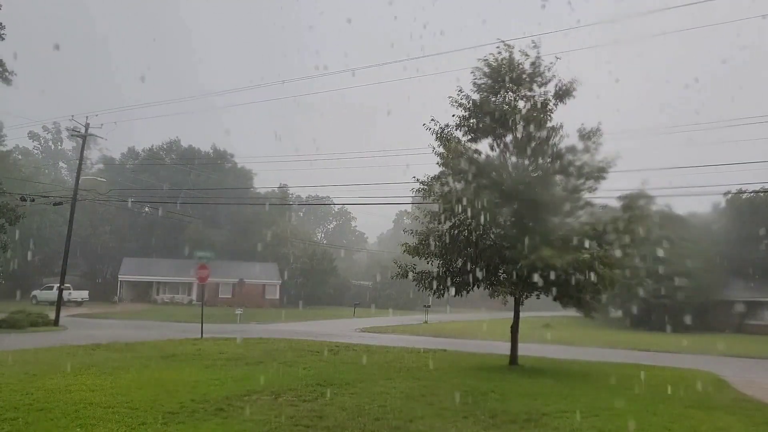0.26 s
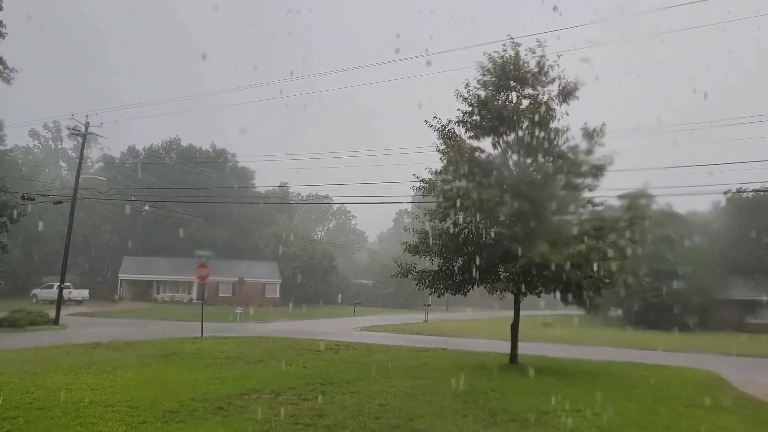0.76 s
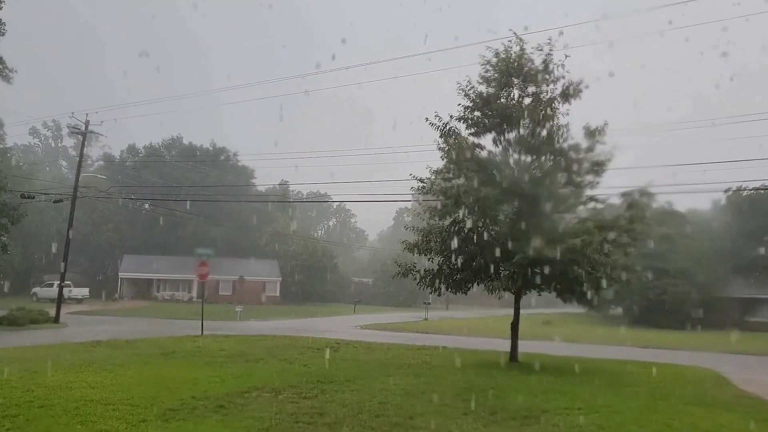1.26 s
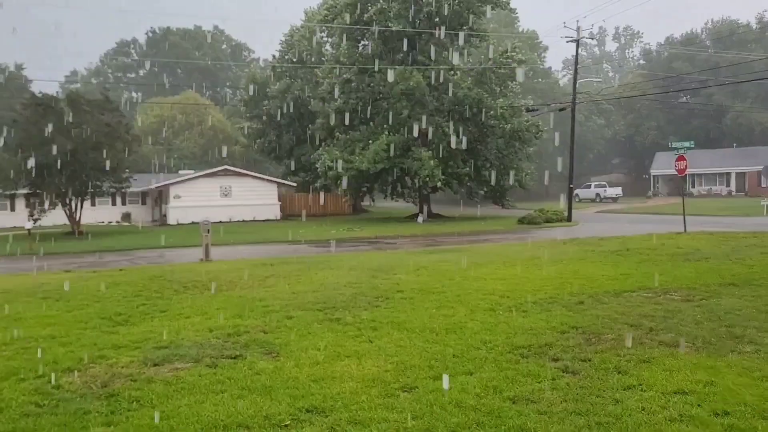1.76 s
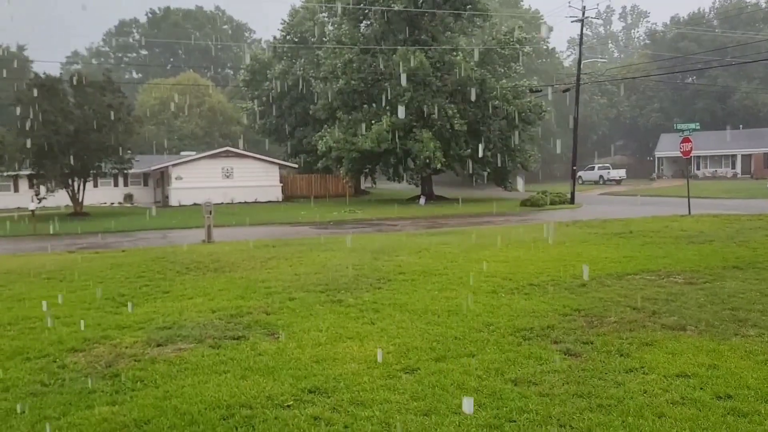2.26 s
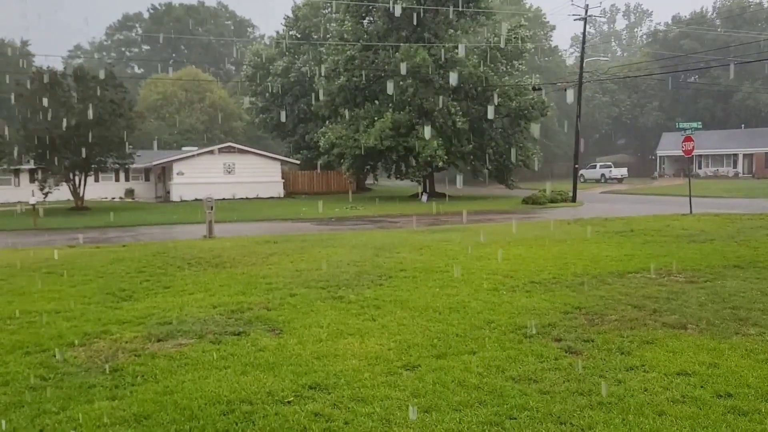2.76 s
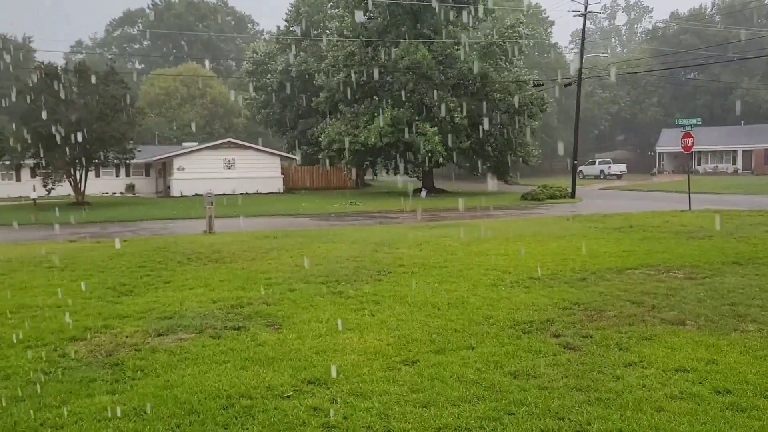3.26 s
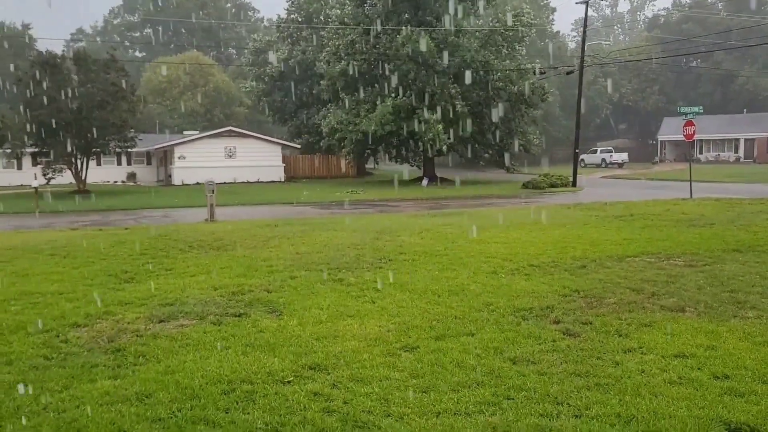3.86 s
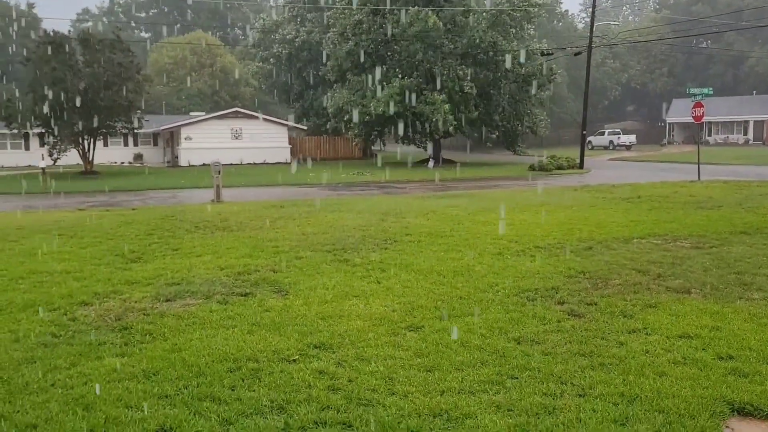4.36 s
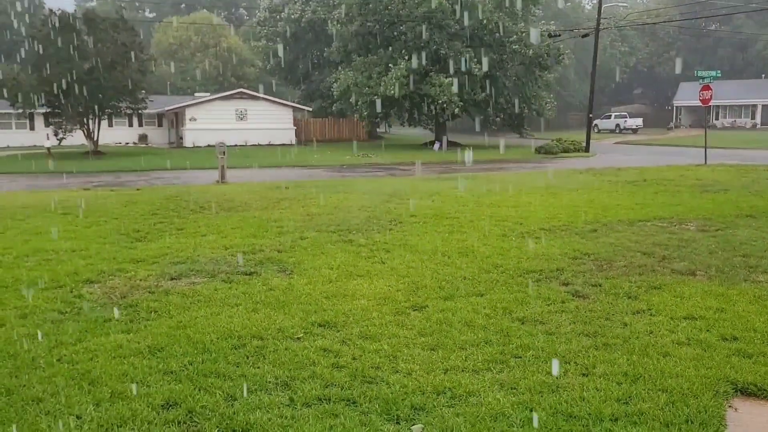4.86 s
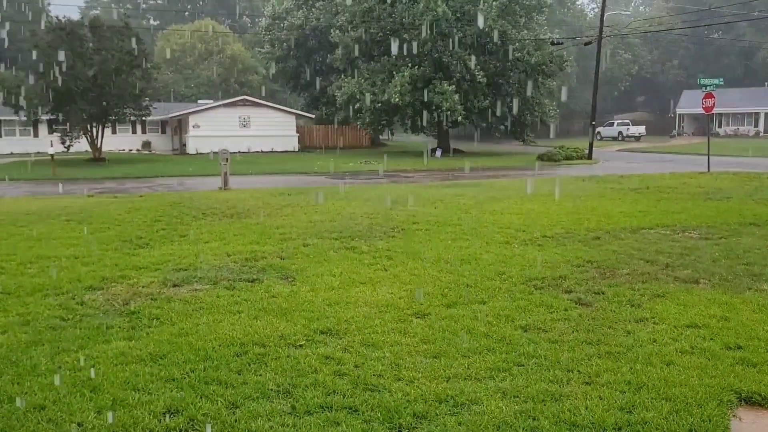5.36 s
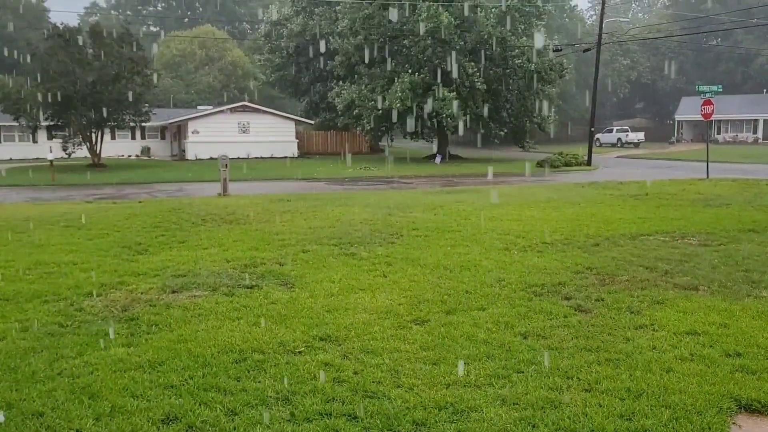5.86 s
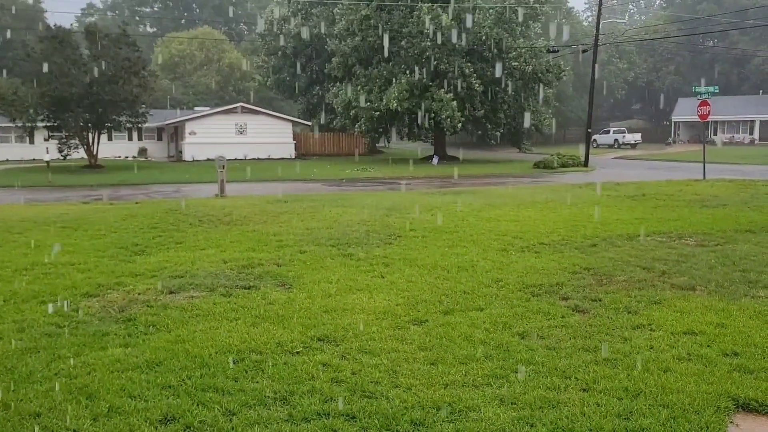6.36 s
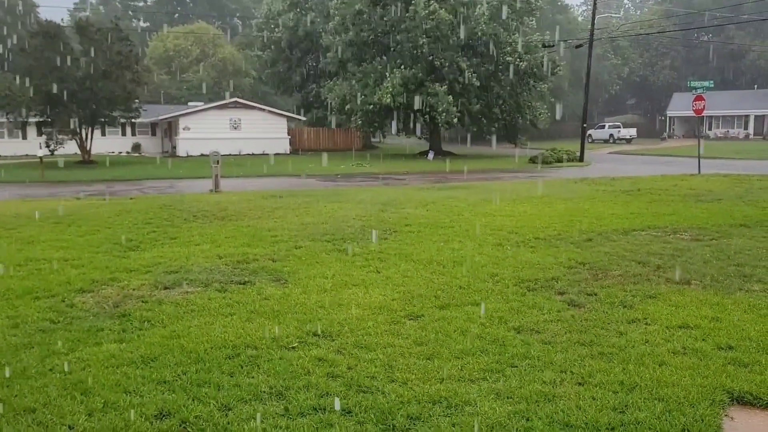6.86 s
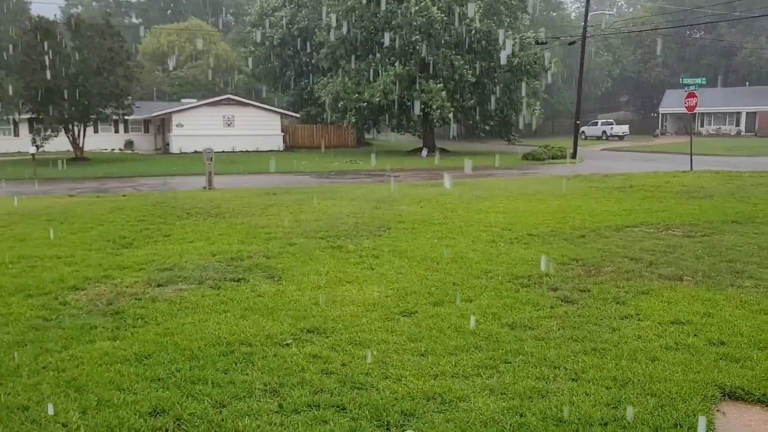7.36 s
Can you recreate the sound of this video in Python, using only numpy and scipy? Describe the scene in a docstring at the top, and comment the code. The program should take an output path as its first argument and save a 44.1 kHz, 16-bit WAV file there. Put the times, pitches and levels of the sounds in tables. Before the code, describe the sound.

Soft rain with low rumble cuts out after a tap, then heavy rain returns with sharp splats, plinks and bumpy handling noise, ending muffled.

```python
"""Heavy rain on trees, then on lawns, heard from a porch in two views with a short silence between them.
Coloured noise makes the low rumble and far wash; sparse impacts make the hiss; short bursts make the patter.
Fat drops slap the ground as a click with a spray behind it, and plink in puddles as rising, smeared sines.
A fingertip taps the case just before the silence. After it a finger rubs the case in stick-slip jerks;
later a hand cups both microphone ports, filtering the rain, and the finger seals the right one."""
import sys
import numpy as np
from scipy import signal
from scipy.fft import rfft, irfft, next_fast_len
from scipy.io import wavfile
from scipy.ndimage import uniform_filter1d, map_coordinates

SR = 44100
rng = np.random.default_rng(int(sys.argv[2]) if len(sys.argv) > 2 else 0)


def file_out(sig):
    """Save sig as 16-bit WAV at sys.argv[1]."""
    # one column per channel
    cols = np.atleast_2d(sig).T
    # limit, then scale
    lim = np.clip(cols, -1, 1)
    pcm = np.round(lim * 32767).astype(np.int16)
    wavfile.write(sys.argv[1], SR, pcm)


N = 335160
TIME = np.arange(N) / SR
TREE_END, LAWN_START = 1.769, 1.874  # s, silence in between


def amp(db):
    """Decibels to gain."""
    return 10 ** (np.asarray(db) / 20)


def unit(x):
    """Scale to rms 1."""
    return x / np.sqrt(np.mean(x ** 2) + 1e-20)


def along(points, hz):
    """Join (f/Hz, value) points on a log frequency axis."""
    f, v = np.transpose(points)
    return np.interp(np.log(hz + 1), np.log(f + 1), v)


def curve(points):
    """Join (t/s, value) points into one value per sample."""
    return np.interp(TIME, *np.transpose(points))


def wobble(rate):
    """A smooth random curve with rate knots a second."""
    return map_coordinates(rng.standard_normal(int(N * rate / SR) + 4), [TIME * rate])


def filtered(x, response):
    """Multiply the spectrum of x by a response given as a function of frequency."""
    n = x.shape[-1]
    padded = next_fast_len(n + 4096)
    return irfft(rfft(x, padded) * response(np.fft.rfftfreq(padded, 1 / SR)), padded)[..., :n]


def coloured(x, spectrum):
    """Shape x by a spectrum, at rms 1."""
    return unit(filtered(x, lambda hz: amp(along(spectrum, hz))))


def add(track, s, sound):
    """Mix a sound into a track at time s."""
    room = track[..., max(round(s * SR), 0):][..., :sound.shape[-1]]
    room += sound[..., :room.shape[-1]]


def lawn_rain():
    """The open second view: rumble, the wash of far trees and street, hiss, patter and dry ticks on the grass."""
    # noise colours: f/Hz, level/dB per Hz
    rumble_colour = [(15, -30), (28, -17), (45, -2.5), (66, 4), (100, -4.5), (135, -2), (200, -13.5),
                     (250, -5), (330, -17.5), (480, -25), (900, -37.5)]
    wash_colour = [(150, -9), (420, 0), (700, 0.5), (950, -1.5), (1500, -0.5), (2150, 2.5), (3000, -3.5),
                   (4500, -9), (9000, -40)]
    hiss_colour = [(1500, -38), (2800, -3), (3800, 2), (5400, 3), (6400, -1.5), (7700, 5), (9000, -2),
                   (10200, 2.5), (12500, -1), (16000, 0.5)]
    # the rumble starts strong and eases once: t/s, level/dB before the grip
    rumble_fade = [(2.8, -33.5), (3.0, -36.5)]
    # showers pass over the near grass: t/s, level/dB from which hiss, drips and ticks are set
    shower = [(1.88, -40), (2.75, -38), (3.55, -41), (4.2, -36), (4.8, -37.5), (5.5, -32.5), (6.1, -36.5),
              (7.2, -38), (7.6, -36.5)]
    # the hand presses tight and relaxes: t/s, grip (0-1)
    hand_grip = [(5.45, 0.04), (6.1, 0.96), (7.0, 1), (7.6, 0.53)]
    grip, near_db = curve(hand_grip), curve(shower)
    # a full grip takes 6 dB from the rumble and from the far wash
    rumble_db = curve(rumble_fade) - 6 * grip
    far_db = -42 - 6 * grip
    rumble = amp(rumble_db + 0.56 * wobble(9)) * rush(rumble_colour, patchy_db=0.5)
    wash = amp(far_db + 0.04) * rush(wash_colour, patchy_db=1.7)
    plops = amp(far_db - 11.5) * patter(count=260, start=LAWN_START, end=N / SR, centre_hz=1890, spread_db=1.0)
    hiss = amp(near_db - 5.0 + 0.82 * wobble(21)) * sizzle(hiss_colour, rate=9000, spread_db=1.0)
    drips = amp(near_db - 6.0) * patter(count=600, start=LAWN_START, end=N / SR, centre_hz=6760, spread_db=2.5)
    ticks = amp(near_db - 16) * sizzle(hiss_colour, rate=260, spread_db=0.5)
    return rumble + wash + plops + hiss + drips + ticks


def tree_rain():
    """The sheltered first view, toward a tree: randomly throbbing rumble, a dull wash and light dripping."""
    # noise colours: f/Hz, level/dB per Hz
    rumble_colour = [(15, -28), (28, -26), (48, 0.5), (85, -7.5), (130, 3), (185, -18), (260, -11),
                     (400, -28.5), (700, -62)]
    wash_colour = [(150, 4.5), (350, 1), (600, -2), (870, -1.5), (1150, -10.5), (2200, -17.5),
                   (4000, -20.5), (9000, -45)]
    hiss_colour = [(1500, -21), (2600, -11), (3300, -8), (4450, 0.5), (5400, -0.5), (6000, -7),
                   (6900, -2.5), (7900, -1.5), (8800, -7.5), (16000, -8.5)]
    # near rain leans left, except in the top treble: f/Hz, left minus right/dB
    lean = [(1000, 5), (2400, 5), (4400, 8), (6500, 9), (9000, -4.5), (15000, -0.5)]
    open_side_lag_s = .00025
    rumble = amp(-42 + 1.5 * wobble(17.35)) * rush(rumble_colour, patchy_db=2.5)
    wash = amp(-47.0) * rush(wash_colour, patchy_db=1.0)
    hiss = amp(-53.0 + 1.6 * wobble(9.83)) * sizzle(hiss_colour, rate=8000, spread_db=3.5)
    drips = amp(-59) * patter(count=150, start=0, end=TREE_END, centre_hz=6680, spread_db=7.5)
    near = filtered(hiss + drips, lambda hz: amp(along(lean, hz) * np.array([[.5], [-.5]])))
    # the open side of the porch lies to the left, so the right port hears it later
    lag = open_side_lag_s * np.array([[-.5], [.5]])
    far = filtered(rumble + wash, lambda hz: np.exp(-2j * np.pi * hz * lag))
    return far + near


def patter(count, start, end, centre_hz, spread_db):
    """Small drops of random size and pitch between two times, at rms 1 over that span."""
    when, size, pitch, width = rng.random((count, 4)).T
    db = -spread_db * np.log(1 - .96 * size)  # mostly faint, a few loud
    sounds = splashes(db, db - 6.5, centre_hz * 2 ** (1.9 * (pitch - .5)), 0.26 + 0.15 * width)
    track = np.zeros((2, N))
    for s, sound in zip(start + when * (end - start), sounds):
        add(track, s, sound)
    return unit(track) * np.sqrt((end - start) / (N / SR))


def sizzle(spectrum, rate, spread_db):
    """Tiny random impacts, rate a second in each channel, merge into a grainy hiss of rms 1."""
    hits = rng.random((2, N)) < rate / SR
    strength = rng.standard_normal((2, N)) * amp(spread_db * rng.standard_normal((2, N)))
    return coloured(hits * strength, spectrum)


def fat_drops():
    """Big drops slap down close by; the spray of each follows from its level and brightness."""
    # the fattest drops, before the hand: t/s, slap level/dB, centre f/Hz, width/octaves
    drops = [(0.227, -33.5, 6100, 0.23), (0.533, -40, 5510, 0.35), (0.581, -44, 4600, .2),
             (0.691, -44, 4330, 0.18), (0.762, -40.5, 4500, 0.32), (0.7804, -43, 5000, 0.35),
             (0.8314, -37.5, 4740, .3), (0.839, -41, 5250, 0.44), (0.9382, -42, 7700, 0.23),
             (0.963, -44, 4900, 0.14), (1.3414, -51, 5200, .25), (1.366, -48, 3500, 0.17),
             (1.4227, -41.5, 4370, .3), (1.5186, -41.5, 5200, .3), (1.93, -26.5, 5960, 0.43),
             (1.944, -25.5, 7020, 0.88), (2.1423, -33, 11000, 0.29), (2.2083, -25.5, 11050, 0.18),
             (2.2824, -26, 7000, 1.1), (2.384, -28.5, 8000, 1.7), (2.4351, -30.5, 9740, .3),
             (2.546, -32, 1340, 0.6), (2.624, -31, 4200, 0.36), (2.717, -27, 7900, .5),
             (2.7428, -25, 9500, 1.4), (2.8485, -23, 9000, 0.46), (3.0331, -25, 5500, 0.81),
             (3.043, -33, 7000, .51), (3.2343, -28, 9700, 0.42), (3.2825, -27, 8800, 0.46),
             (3.754, -23, 6000, 1.2), (3.7622, -26.5, 4900, 0.63), (3.8256, -19.5, 8500, 0.47),
             (3.841, -27, 6460, 0.51), (3.926, -17.5, 12500, .45), (4, -33, 5360, 0.86),
             (4.0253, -23.5, 6700, 0.62), (4.18, -28.5, 7600, .35), (4.191, -29, 10500, .25),
             (4.2145, -24.5, 9480, 0.31), (4.3627, -31, 5450, 0.59), (4.3894, -25, 6300, .45),
             (4.425, -27.5, 5730, 0.44), (4.456, -29, 4700, 0.34), (4.4977, -28.5, 5000, .7),
             (4.5, -31, 8000, 0.73), (4.517, -27, 5500, 0.91), (4.603, -31.5, 3020, 0.36),
             (4.874, -21.5, 4120, 0.32), (4.9972, -22, 6800, 0.66), (5.016, -31, 12500, 0.45),
             (5.0357, -31, 10800, 0.33), (5.056, -26.5, 6300, 0.5), (5.1176, -20.5, 11660, 0.3),
             (5.416, -25, 5300, 0.32), (5.63, -27.5, 5000, 0.23), (5.7292, -24.5, 7000, 1.5),
             (5.858, -25.5, 4900, 0.58), (5.9251, -19.5, 4040, 0.74), (6.1754, -30.5, 3960, 0.17),
             (6.222, -18, 4700, 0.8), (6.2265, -31.5, 4030, 0.73), (6.434, -29.5, 4500, 0.84),
             (6.461, -26, 9100, 0.28), (6.6603, -28.5, 7640, 0.79), (6.982, -26.5, 10030, 0.66),
             (7.2818, -22, 5140, 0.76), (7.349, -32, 5400, 0.49), (7.475, -29.5, 3930, .5)]
    s, slap_db, centre_hz, octaves = np.transpose(drops)
    # dull drops land in water and throw more spray: 4 dB less per octave up
    spray_db = slap_db - 11 - 4 * np.log2(centre_hz / 6500)
    sounds = splashes(slap_db, spray_db, centre_hz, octaves, skirt=0.11, spray_t60=0.091, aside_s=.00003)
    track = np.zeros((2, N))
    for start, sound in zip(s, sounds):
        add(track, start - .001, sound)  # contact falls 1 ms into each splash
    return track


def splashes(slap_db, spray_db, centre_hz, octaves, skirt=0.061, spray_t60=0.12, clumpy_db=4, aside_s=.00015):
    """One stereo splash per drop: a click that reaches the ports a little apart, then diffuse spray."""
    size, contact_s = 2048, .001
    t, hz = np.arange(size) / SR - contact_s, np.fft.rfftfreq(size, 1 / SR)
    count = len(slap_db)

    def column(v):
        """One value per drop, ready to multiply its channels and samples."""
        return np.reshape(v, (-1, 1, 1))

    def level(x, db, span):
        """Set the level as rms over a nominal span in seconds."""
        energy = (x ** 2).sum(2).mean(1)
        return x * amp(column(db)) * column(np.sqrt(span * SR / energy))

    off = np.log2((hz + 1) / column(centre_hz)) / column(octaves) / 2
    band = np.exp(-off ** 2) + skirt * np.exp(-(off / 2) ** 2)
    bearing, phase = rng.uniform(-1, 1, (count, 2)).T
    arrival = contact_s + column(bearing) * np.array([[aside_s], [-aside_s]])
    # the drop bursts: a brief crackle trails its first contact
    crackle = rng.standard_normal((count, 1, size)) * 0.42 * amp(-60 * (t - t[0]) / 0.0084)
    burst = 1 + rfft(crackle)
    slap = irfft(band * burst * np.exp(1j * np.pi * (column(phase) - 2 * hz * arrival)))
    # the spray lands as separate droplets
    clumps = unit(uniform_filter1d(rng.standard_normal((count, 1, size)), size=32))
    droplets = rng.standard_normal((count, 2, size)) * amp(clumpy_db * clumps)
    spray = irfft(band * rfft(droplets * (t > 0) * amp(-60 * abs(t) / spray_t60)))
    return level(slap, slap_db, 0.0013) + level(spray, spray_db, 0.016)


def plinks():
    """Clear plinks of single drops that trap a bubble in a puddle."""
    # t/s, starting f/Hz, level/dB before onset, random port gain and the hand
    rows = [(0.695, 4480, -41), (0.78, 4500, -42), (0.932, 2690, -46), (0.968, 2720, -51),
            (1.02, 2700, -56), (1.088, 2700, -49), (1.424, 4430, -36), (2.072, 3480, -26),
            (2.548, 970, -30.5), (2.549, 1490, -33), (3.12, 1443, -30.5), (3.262, 756, -38),
            (3.286, 947, -34), (3.305, 1410, -41), (3.427, 2000, -30), (3.495, 1225, -34),
            (3.52, 2120, -30), (3.526, 984, -26.5), (3.604, 3220, -31), (3.909, 3230, -31.5),
            (4.085, 1480, -32), (4.308, 3400, -29), (4.608, 1730, -29), (5.476, 924, -31.5)]
    return bubbles(rows)


def puddles(count, start, end, centre_hz, peak_db):
    """Faint plinks at random times, pitches and levels between two times."""
    when, pitch, size = rng.random((count, 3)).T
    return bubbles(zip(start + when * (end - start), centre_hz * 2 ** (2.2 * (pitch - .5)), peak_db - 11 * size))


def bubbles(rows, cycles=40, rise=1.36, slosh=0.67):
    """Each trapped bubble rings for some cycles, climbing in pitch, while the sloshing water smears its tone."""
    track, t = np.zeros((2, N)), np.arange(SR // 10) / SR
    for s, hz, db in rows:
        # high bubbles ring for more cycles
        life = amp(db - 60 * t * hz / (cycles + hz * 0.018)) * (1 - np.exp(-t / 0.0016))
        ports = rng.uniform(-1, 1, (2, 1))  # small level and phase offsets
        smear = slosh * np.cumsum(rng.standard_normal((2, len(t))), axis=1) / np.sqrt(.001 * SR)
        tone = np.sin(2 * np.pi * hz * t * (1 + rise * t / 2) + ports + smear)
        add(track, s, life * amp(2 * ports) * tone)
    return track


def finger():
    """Skin sticks and slips on the case: each stroke is a swelling or fading run of jerks that thud and scrape."""
    # strokes at the right port: t/s, hold/s, swell over the hold/dB, thud level/dB, scrape level/dB, pitch factor;
    # both levels are before the press envelope and port gains
    strokes = [(1.895, 0.025, 7, -24.5, -48, 0.64), (2.11, 0.0092, -11, -21.5, -54, 0.95),
               (2.183, 0.038, -10, -24.5, -55, 0.94), (2.276, 0.026, -6, -24, -41, 1.16),
               (2.384, 0.045, -13, -19.5, -53, 1.1), (2.561, 0.047, 1, -18, -48, 0.83),
               (2.64, 0.028, -8, -21.5, -58, .55), (2.729, 0.047, 4.5, -24.5, -58, 0.55),
               (5.524, 0.018, -2, -25, -30.5, 1.26), (5.548, 0.069, -18.5, -10.5, -21, 1.45),
               (5.625, 0.032, 0, -14.5, -30.5, 1.08), (5.723, .012, 1, -33, -35, 1.1),
               (5.746, 0.024, -10, -24, -35, 1.78), (5.903, 0.021, 11, -17.5, -38, 1.02),
               (5.933, 0.043, 0, -6.5, -28.5, 0.97), (5.979, .056, -12, -10.5, -33, 1),
               (6.05, 0.0079, -6, -19, -33, 1.15), (6.062, 0.032, -14.5, -9, -32, 1.05),
               (6.168, 0.04, -12.5, -18, -42, 1.21), (6.267, 0.03, -2, -32, -50, 1.07),
               (6.33, 0.037, 6.5, -12, -45.5, 1.12), (6.523, 0.0078, -6, -14, -54, 0.93),
               (6.54, 0.019, -5.5, -21, -43, 1.2), (6.608, .03, 3, -25, -51, 1.01),
               (6.977, 0.0094, -9, -17.5, -52, 1.15), (6.988, 0.012, -9.5, -12, -46, .85),
               (7.005, 0.027, 0.5, -21.5, -49, 0.98), (7.13, 0.0042, -1, -27, -64, 0.99),
               (7.219, .006, 1, -26, -62, 1.07)]
    # skin on the case, dull to bright: f/Hz, level/dB per Hz (thud before the pitch factor)
    thud_colour = [(15, -36), (35, 13), (60, 13), (110, 8), (160, 2), (205, 2), (290, 1.5), (360, -5),
                   (500, -39), (1500, -51), (6000, -115)]
    scrape_colour = [(200, -29), (600, 7), (1100, 1.5), (2400, -1), (4000, -10.5), (6000, -24), (8200, -58),
                     (11000, -20), (15500, -23)]
    # the hollow knock within the strokes: f/Hz, level/dB per Hz
    knock_colour = [(100, -21.5), (220, -3.5), (300, 7), (335, 0.5), (372, 3.5), (470, -2), (600, -6),
                    (690, -5.5), (900, -14.5), (1500, -22.5), (4000, -57), (8000, -100)]
    attack_s, release_s = .018, 0.044  # s per 60 dB
    track = np.zeros(N)
    for s, hold, swell_db, thud_db, scrape_db, pitch in strokes:
        lead = round(.02 * SR)
        t = (np.arange(round((hold + .14) * SR)) - lead) / SR
        press = amp(-60 * (np.maximum(-t, 0) / attack_s + np.maximum(t - hold, 0) / release_s))
        press = press * amp(swell_db * np.clip(t / hold, 0, 1) - max(swell_db, 0))
        # the knock grows faster than the thud
        knock_db = thud_db - 12 + 0.54 * (thud_db + 16.5)
        # from the first touch on, the skin catches and lets go by turns
        waits = (.0016 + .0052 * rng.random(size=120) ** 2) / pitch
        at = lead + ((np.cumsum(waits) - waits[0]) * SR).astype(int)
        at = at[at < len(t)]
        jerks = np.zeros(len(t))
        uneven = amp(2 * rng.standard_normal(size=120)[:len(at)])
        jerks[at] = (-1) ** np.arange(len(at)) * uneven * press[at]
        # each jerk sets off a scrape that dies away with a 2.2 ms time constant
        catch = signal.lfilter([1], [1, -np.exp(-1 / (0.0022 * SR))], abs(jerks))
        scrape = amp(scrape_db) * coloured((catch + .4 * press) * rng.standard_normal(SR)[:len(t)], scrape_colour)
        thud = amp(thud_db) * struck(jerks, thud_colour, pitch)
        knock = amp(knock_db) * struck(jerks, knock_colour)
        add(track, s + t[0], np.sqrt(np.mean(press ** 2)) * (thud + knock + scrape))
    # hardly any of it reaches the far port
    return track * amp([[-30], [-1]])


def struck(x, spectrum, pitch=1):
    """Ring jerks x through a minimum-phase filter, its spectrum shifted by a pitch factor, at rms 1."""
    size = 16384
    cepstrum = irfft(np.log(amp(along(spectrum, np.fft.rfftfreq(size, 1 / SR) / pitch))))
    # folding the cepstrum puts the energy as early as it can be
    response = np.exp(rfft(2 * cepstrum[:size // 2], size))
    return unit(irfft(rfft(x, size) * response)[:len(x)])


def tap(s=1.6692, click_hz=810, click_s=0.00079, buzz_t60=0.052, bend=0.38, bend_s=0.0065):
    """A fingertip taps the case: a round click, a tick, a buzz and a short ring that sinks as the pressure eases."""
    # ringing modes of the case: settled f/Hz, level/dB before onset and port gain, t60/s
    modes = [(140, -40, 0.081), (272, -34.5, 0.18), (400, -33, .06), (635, -38, .04), (960, -37, 0.091),
             (1170, -44, .05)]
    # its loose parts buzz briefly: f/Hz, level/dB per Hz
    buzz_colour = [(200, -20), (450, -3), (1000, -3), (1500, 1), (2400, -19), (4000, -33), (8000, -70)]
    track, t = np.zeros(N), np.arange(SR // 5) / SR
    u = t - 3 * click_s
    add(track, s - 2 * click_s, amp(-19.5) * np.exp(-(u / click_s) ** 2) * np.cos(2 * np.pi * click_hz * u))
    sinking = t + bend * bend_s * (1 - np.exp(-t / bend_s))
    ring = sum(amp(db - 60 * t / t60) * np.sin(2 * np.pi * hz * sinking) for hz, db, t60 in modes)
    ring = ring * (1 - np.exp(-t / 0.0051))
    buzz = amp(-37 - 60 * t / buzz_t60) * coloured(rng.standard_normal(len(t)), buzz_colour)
    dull_noise = filtered(rng.standard_normal(len(t)), lambda hz: 1 / (1 + (hz / 3800) ** 4))
    tick = amp(-36 - 60 * t / 0.015) * unit(dull_noise)
    add(track, s, ring + buzz + tick)
    return track * amp([[1.5], [-2]])


def rush(spectrum, patchy_db):
    """Diffuse stereo noise of rms 1 with drifting patches of gain, for far rumble and wash."""
    # left-right likeness of the open air: f/Hz, coherence (0-1)
    alike = [(60, 0.82), (130, 0.98), (290, 0.77), (640, 0.57), (1400, 0), (15000, 0.48)]
    z = signal.stft(rng.standard_normal((2, N)), nperseg=512)[2]
    field = uniform_filter1d(rng.standard_normal(z.shape[1:]), size=6, axis=0)
    field = uniform_filter1d(field, size=12, axis=1)
    pair = signal.istft(z * amp(patchy_db * unit(field)), nperseg=512)[1][:, :N]

    def mid_side(hz):
        """Share the spectrum between mid and side to give the wanted coherence."""
        turn = np.arccos(np.clip(along(alike, hz), -1, 1)) / 2
        return amp(along(spectrum, hz)) * [np.cos(turn), np.sin(turn)]

    mid, side = filtered(pair, mid_side)
    return unit(np.array([mid + side, mid - side]))


def hand(air):
    """The hand closes in round both ports, then the finger shuts the right one; both act as moving filters."""
    # the hollow of the hand cancels a band at both ports: f/Hz, gain/dB at full cupping
    cup_gain = [(2500, 1.5), (4200, -0.5), (5900, 1.5), (6900, -2.5), (7500, -12), (8100, -16.5),
                (9300, -13), (11500, -2), (13500, -3), (15400, 0)]
    # the hand curls round and opens a little: t/s, cupping (0-1)
    cupping = [(5.12, 0.02), (5.5, 1), (6.4, 1), (7.6, 0.67)]
    # what passes the finger: f/Hz, gain/dB before the leak is added and the sum capped at 0
    seal_gain = [(70, 24), (250, -9), (500, -9.5), (1000, -14), (2100, -19.5), (3300, -29), (6000, -43.5),
                 (8500, -41), (11000, -28), (15000, -16)]
    # the gap left by the finger: t/s, leak/dB
    finger_gap = [(5.5, 49), (5.62, 25), (5.7, 16), (5.88, 17), (6.1, 11), (6.3, 10.5), (6.42, 2.5),
                  (7.6, -1)]
    hz, t, z = signal.stft(air, SR, nperseg=512)
    cupped_db = along(cup_gain, hz)[:, None] * np.interp(t, *np.transpose(cupping))
    sealed_db = np.minimum(along(seal_gain, hz)[:, None] + np.interp(t, *np.transpose(finger_gap)), 0)
    return signal.istft(z * amp([cupped_db, cupped_db + sealed_db]), SR, nperseg=512)[1][:, :N]


def scene():
    """Rain of the two views through the ports, plus the finger on the case."""
    tree = tree_rain() + puddles(count=30, start=0, end=TREE_END, centre_hz=3190, peak_db=-49.5)
    lawn = lawn_rain() + puddles(count=130, start=LAWN_START, end=N / SR, centre_hz=2330, peak_db=-38.5)
    air = np.where(TIME < TREE_END, tree, lawn) + fat_drops() + plinks()
    return hand(air) + finger() + tap()


def record(dry):
    """Mute the gap between the views with 2 ms ramps, clip peaks and cut everything from 15.9 kHz up."""
    running = np.clip(np.maximum(TREE_END - TIME, TIME - LAWN_START) / .002, 0, 1)
    return filtered(np.clip(dry * running, -1, 1), lambda hz: hz < 15900)


dry = scene()
out = record(dry)
file_out(out)
```